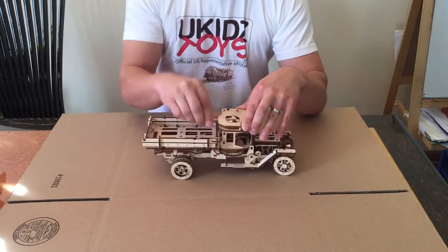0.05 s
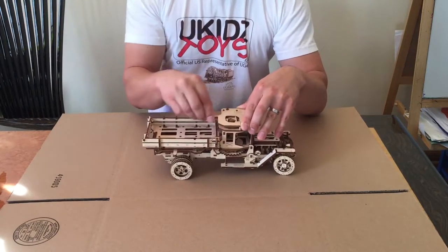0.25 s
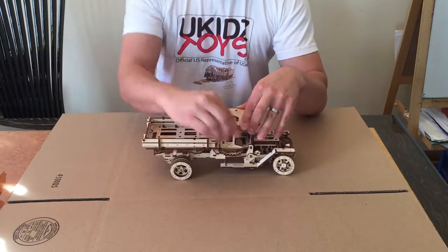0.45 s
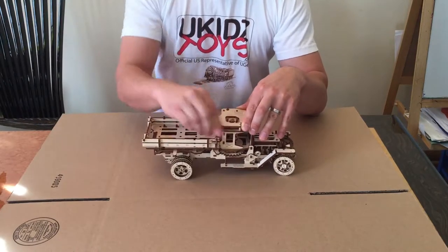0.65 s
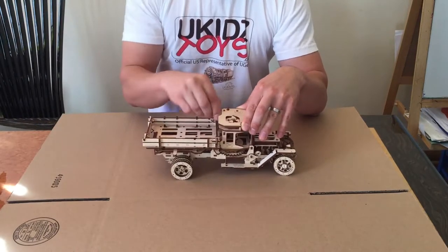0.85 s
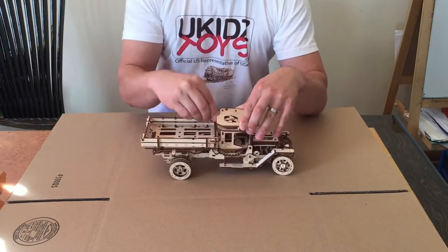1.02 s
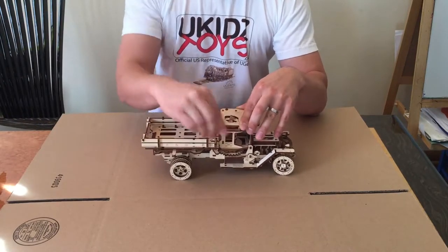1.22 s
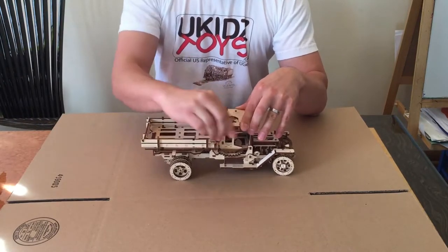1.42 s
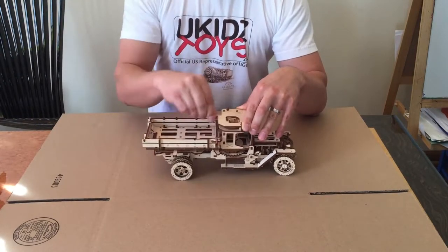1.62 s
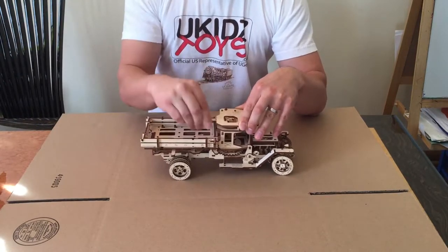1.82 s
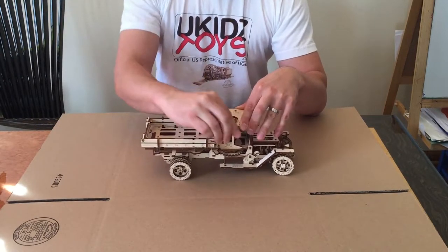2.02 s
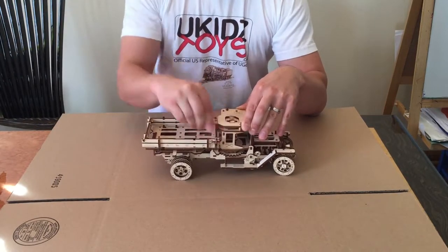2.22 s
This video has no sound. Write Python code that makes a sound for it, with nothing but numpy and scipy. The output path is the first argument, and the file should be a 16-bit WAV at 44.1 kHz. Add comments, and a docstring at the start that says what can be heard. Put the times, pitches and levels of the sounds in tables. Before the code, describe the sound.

Three short runs of crisp, bright ratchet clicks from a small wooden mechanism in a quiet room

```python
"""In a live room, one microphone hears a wooden toy truck whose ratchet is wound in three strokes of a lever.
On each stroke the springy pawl snaps over six or seven teeth: decaying sines, a noise crack, a low knock.
Near echoes, the ringing plywood frame and the room's tail of decaying noise follow every snap.
Around the strokes the lever gives faint noise ticks; fingers and lever slide and rub as shaped noise,
and hands nudge the truck on its cardboard mat in dull swells, over quiet room air and a faint hum."""
import sys
import numpy as np
from scipy import signal
from scipy.fft import rfft, irfft, next_fast_len
from scipy.io import wavfile
from scipy.ndimage import map_coordinates

SR = 44100
rng = np.random.default_rng(int(sys.argv[2]) if len(sys.argv) > 2 else 0)


def pcm_store(signal):
    """Save signal as 16-bit PCM."""
    levels = np.round(np.clip(np.atleast_2d(signal), -1, 1) * 32767)
    wavfile.write(sys.argv[1], SR, levels.astype(np.int16).T)


N = 101430
T = np.arange(N) / SR  # time in s


def amp(db):
    """Decibels to gain."""
    return 10 ** (np.asarray(db) / 20)


def decay(t, t60):
    """Exponential fade that has fallen by 60 dB at time t60."""
    return amp(-60 * t / t60)


def unit(x):
    """Scale to rms 1."""
    return x / np.sqrt(np.mean(x ** 2) + 1e-30)


def unit_energy(x):
    """Scale to energy 1."""
    return x / (np.linalg.norm(x) + 1e-20)


def along(points, hz):
    """Read (frequency, value) points on a log frequency axis."""
    point_hz, value = np.transpose(points)
    return np.interp(np.log(hz + 1), np.log(point_hz + 1), value)


def filtered(x, gain):
    """x times a gain that depends on frequency."""
    size = next_fast_len(len(x) + 4096)
    hz = np.fft.rfftfreq(size, 1 / SR)
    return irfft(rfft(x, size) * gain(hz), size)[:len(x)]


def noise(gain, size):
    """Coloured noise of rms 1."""
    return unit(filtered(rng.standard_normal(size), gain))


def hump(centre_hz, width_oct, skirt=0):
    """Gain of one broad resonance over a flat skirt."""
    return lambda hz: np.exp(-.5 * (np.log2((hz + 1) / centre_hz) / width_oct) ** 2) + skirt


def treble_limit(hz, top_hz):
    """Gain that falls steeply above top_hz."""
    return 1 / (1 + (hz / top_hz) ** 20)


def resonant(table, hz):
    """Gain of a set of resonances over a level of 1; a negative level makes a dip."""
    power = 1
    for centre_hz, width_hz, level_db in table:
        power = power + (amp(level_db) ** 2 - 1) / (1 + (2 * (hz - centre_hz) / width_hz) ** 2) ** 2
    return np.sqrt(np.abs(power))


def add(track, start_s, x):
    """Mix x into the track at start_s."""
    i = max(0, round(start_s * SR))
    track[i:i + len(x)] += x[:max(0, len(track) - i)]


def strength(db):
    """Size of a click of energy 1 that has this level over 3.6 ms."""
    return amp(db) * np.sqrt(.0036 * SR)


# colour of the indoor air: frequency [Hz], relative level [dB]
AIR_COLOUR = [(20, -11), (40, -10), (60, 1.5), (120, -4), (250, -4), (450, -13.5), (1000, -17),
              (3000, -20.5), (7000, -31.5), (13000, -33.5), (16000, -50)]
AIR_DB, HUM_HZ, HUM_DB = -67.5, 120.5, -73  # levels are rms


def room_tone():
    """Quiet indoor air as steady coloured noise, with a faint hum as one sine."""
    air = amp(AIR_DB) * noise(lambda hz: amp(along(AIR_COLOUR, hz)), N)
    hum = amp(HUM_DB) * np.sqrt(2) * np.sin(2 * np.pi * HUM_HZ * T)
    return air + hum


# how long each frequency lives in the room: frequency [Hz], t60 [s]
ROOM_DECAY = [(200, 0.28), (1200, 0.42), (3500, 0.38), (6000, 0.49), (9000, 0.38), (15000, 0.087)]


def room_tail(gain):
    """Reverberation of energy 1: noise in which each frequency dies at its own speed."""
    hz, t, spectrum = signal.stft(noise(gain, size=SR * 3 // 4), SR, nperseg=256)
    fade = decay(t, along(ROOM_DECAY, hz)[:, None])
    tail = signal.istft(spectrum * fade, SR, nperseg=256)[1]
    build_up = 1 - np.exp(-T[:len(tail)] / 0.0013)
    return unit_energy(tail * build_up)


HANDLING_TOP_HZ = 13600  # treble limit of the slide, the rubs and the bumps


def swells(rows, width_oct, skirt=0):
    """Friction and soft contact as short bell-shaped swells of noise, each round its own pitch."""
    out = np.zeros(N)
    for centre_s, length_s, level_db, pitch_hz in rows:
        shape = np.exp(-2 * ((T - centre_s) / length_s) ** 2)
        colour = hump(pitch_hz, width_oct, skirt)
        rustle = noise(lambda hz: colour(hz) * treble_limit(hz, HANDLING_TOP_HZ), N)
        out += amp(level_db) * np.linalg.norm(shape) * unit_energy(shape * rustle)
    return out


# hands nudge the truck on the mat: centre_s [s], length_s from centre to 13 % [s], level_db [dB], pitch_hz [Hz]
NUDGES = [(.22, 0.09, -64, 126), (.455, 0.024, -61, 178), (.62, 0.056, -71, 70), (.98, 0.11, -61, 110),
          (1.18, 0.042, -62.5, 205), (1.26, .06, -63.5, 74.4), (1.64, 0.025, -57, 68.7),
          (1.71, .05, -59, 117), (1.95, 0.096, -59.5, 57.5), (2.12, 0.067, -66, 70)]


def mat_bumps():
    """Dull low swells as the hands nudge the truck on its cardboard mat."""
    return swells(NUDGES, width_oct=0.51)


# fingers and lever sliding, before roughness: time_s [s], level_db [dB]
SLIDE_COURSE = [(0, -68), (.04, -62.5), (.07, -93), (.11, -77), (.17, -60), (.5, -70.5), (.62, -61),
                (.71, -67), (.755, -76.5), (.83, -62), (1.3, -65), (1.42, -64.5), (1.52, -67),
                (1.59, -82.5), (1.68, -63.5), (2.1, -67), (2.19, -65.5), (2.27, -82.5)]
# colour of the sliding: frequency [Hz], relative level [dB]
SLIDE_COLOUR = [(300, -24), (1000, 3), (2500, 2), (4500, 2), (6500, 3), (8500, -1.5), (13000, 2),
                (14500, -12.5)]


def sliding(rough_db=1.35, grain_rate_hz=200):
    """Fingers and lever slide: coloured noise whose level wavers in fine random grains."""
    grain = map_coordinates(rng.standard_normal(2048), [T * grain_rate_hz], mode="wrap")
    level_db = np.interp(T, *np.transpose(SLIDE_COURSE)) + rough_db * grain
    slide = amp(level_db) * noise(lambda hz: amp(along(SLIDE_COLOUR, hz)), N)
    return filtered(slide, lambda hz: treble_limit(hz, HANDLING_TOP_HZ))


# wood rubs on wood: centre_s [s], length_s from centre to 13 % [s], level_db [dB], pitch_hz [Hz]
WOOD_RUBS = [(.149, 0.025, -57, 4440), (.192, 0.019, -69, 5960), (.62, 0.027, -70, 2200),
             (.808, 0.022, -61, 3970), (.862, 0.022, -57.5, 5000), (1.172, 0.016, -48.5, 4700),
             (1.287, 0.028, -57, 1500), (1.375, 0.011, -69, 3030), (1.42, 0.029, -70.5, 1400),
             (1.703, 0.022, -62, 5950), (2.295, 0.025, -70, 1630)]


def rubs():
    """Short swells of brighter noise as wood rubs on wood."""
    return swells(WOOD_RUBS, width_oct=0.33, skirt=amp(-13))


# the lever takes up its slack: start_s [s], level_db of the tick itself [dB], pitch_hz [Hz]
LEVER_TICKS = [(.0322, -56, 6600), (0.033, -54, 2700), (.126, -44.5, 5780), (.718, -60.5, 6500),
               (0.791, -50, 4870), (0.834, -55, 3570), (1.1559, -42, 4900), (1.156, -59, 610),
               (1.251, -57, 2000), (1.42, -62, 1644), (1.519, -61.5, 5000), (1.629, -55, 4540),
               (1.645, -67, 4200), (1.667, -63, 3850)]
# resonances of the lever: centre_hz [Hz], width_hz [Hz], level_db [dB]
LEVER_MODES = [(3400, 380, 10), (4370, 220, 4), (5300, 400, -2), (6850, 540, 1.5), (9300, 630, 4)]
LEVER_TOP_HZ, TICK_WIDTH_OCT, TICK_SKIRT_DB = 13000, .4, -10.5
TICK_T60_S, RATTLE_T60_S = .016, 0.099
RATTLE_DB, TICK_ROOM_DB = -7, -10  # energy against the tick


def ticks():
    """Light contacts of the loose lever: a noise tick, sparse rattling grains and the room's tail."""
    out, t = np.zeros(N), T[:SR // 10]
    for start_s, level_db, pitch_hz in LEVER_TICKS:
        band = hump(pitch_hz, TICK_WIDTH_OCT, amp(TICK_SKIRT_DB))
        colour = lambda hz: band(hz) * resonant(LEVER_MODES, hz) * treble_limit(hz, LEVER_TOP_HZ)
        tick = unit_energy(noise(colour, len(t)) * decay(t, TICK_T60_S))
        # about one sample in fifty holds a grain
        grains = rng.standard_normal(len(t)) * (rng.random(len(t)) < .02)
        rattle = unit_energy(filtered(grains * decay(t, RATTLE_T60_S), colour))
        add(out, start_s, strength(level_db) * (tick + amp(RATTLE_DB) * rattle))
        add(out, start_s, strength(level_db + TICK_ROOM_DB) * room_tail(colour))
    return out


# resonances of the plywood frame: centre_hz [Hz], width_hz [Hz], level_db [dB]
FRAME_MODES = [(984, 150, 7), (1153, 160, 9), (1860, 110, 7.5), (2157, 230, 5.5), (2630, 170, 2),
               (2922, 24, 9), (4010, 150, -3), (4630, 110, 2.5), (5240, 400, 6.5), (5670, 400, 6),
               (6270, 270, 11.5), (6900, 57, 6.5), (7320, 52, 6.5), (8660, 630, 6.5)]
# broad slope under them: frequency [Hz], relative level [dB]
FRAME_SLOPE = [(100, -31), (400, -36), (750, -18), (1400, -8), (2000, -5.5), (4000, 2.5), (6000, 0.5),
               (9500, -0.5), (12000, -0.5), (15500, -12)]


def frame_gain(hz):
    """What the whole frame radiates: a broad slope with its resonances on top."""
    return amp(along(FRAME_SLOPE, hz)) * resonant(FRAME_MODES, hz)


SHIVER_HOLD = 2.7  # times longer than the width of a resonance implies


def shiver():
    """The frame's resonances ring on after a snap as decaying sines, the narrow ones longest."""
    t = T[:SR // 5]
    ring = np.zeros(len(t))
    for hz, width_hz, level_db in FRAME_MODES:
        mode_db = level_db + along(FRAME_SLOPE, hz) + 2 * rng.standard_normal()
        fade = np.exp(-np.pi * width_hz * t / SHIVER_HOLD)
        ring += amp(mode_db) * width_hz * fade * np.sin(2 * np.pi * (hz * t + rng.random()))
    return unit_energy(ring * (1 - np.exp(-t / 0.00099)))


# modes of the pawl at its reference pitch: frequency [Hz], relative level [dB], t60 [s]
PAWL_MODES = [(1005, -32.5, 0.011), (2687, -24.5, .014), (4250, -19, 0.012), (5460, -3.5, 0.0029),
              (6027, 2.5, 0.0038), (6616, -2, .0068), (7205, -8.5, .005), (8730, -6, 0.0035),
              (10500, -9, 0.0035), (10830, -10.5, 0.0032), (13300, -7, 0.0016), (15700, -13, 0.0019)]
# colour of the tooth's edge scraping past: frequency [Hz], relative level [dB]
CRACK_COLOUR = [(300, -36), (1500, -29), (3000, -10), (6000, -2.5), (9000, -1), (14000, 0), (16500, -14.5)]
PAWL_REFERENCE_HZ, ATTACK_S, MODE_SCATTER_DB = 6350, .00005, 0.2
CRACK_S, CRACK_DB = 0.0021, -11.0206  # energy against the pawl's ring
KNOCK_HZ, KNOCK_T60_S, KNOCK_BASE_DB = 560, 0.0013, -44.4748  # each click adds its own knock level


def snap(pitch_hz, knock_db):
    """One drop of the pawl: its modes as decaying sines, a noise crack and a low knock."""
    t = T[:1024]
    ring = np.zeros(len(t))
    for k, (mode_hz, mode_db, t60) in enumerate(PAWL_MODES):
        level = amp(mode_db + MODE_SCATTER_DB * rng.standard_normal())
        tone = np.sin(2 * np.pi * mode_hz * pitch_hz / PAWL_REFERENCE_HZ * t)
        ring += (-1) ** k * level * decay(t, t60) * tone  # neighbours start in opposite directions
    ring *= 1 - np.exp(-t / ATTACK_S)
    crack = noise(lambda hz: amp(along(CRACK_COLOUR, hz)), len(t)) * np.exp(-(t / CRACK_S) ** 2)
    knock = amp(KNOCK_BASE_DB + knock_db) * np.sin(2 * np.pi * KNOCK_HZ * t) * decay(t, KNOCK_T60_S)
    return unit_energy(unit_energy(ring) + amp(CRACK_DB) * unit_energy(crack) + knock)


# the pawl drops off a tooth: start_s [s], level_db [dB], pitch_hz [Hz], knock_db above its base [dB]
TOOTH_DROPS = [(0.2055, -15.5, 6430, 14), (0.2346, -16, 6310, -11), (0.2612, -16.5, 6200, -8),
               (0.2841, -16, 6320, -1), (0.3082, -16.5, 6380, -15), (0.3343, -18, 6020, -13.5),
               (.38, -16.5, 6340, -14), (0.8778, -15, 6290, 12.5), (.906, -14.5, 6240, 8),
               (0.9292, -16.5, 6100, -0.5), (0.9529, -16, 6280, 10.5), (0.9779, -18, 6520, -0.5),
               (1.0019, -16.5, 6050, -1.5), (1.0288, -17.5, 6140, -11.5), (1.7204, -15.9, 6120, 10.5),
               (1.7488, -15.5, 6210, 3.5), (1.7744, -15.5, 6140, -10), (1.7976, -16.5, 6070, -12),
               (1.8225, -16.5, 6230, 2.5), (1.8503, -18.1, 6160, 1)]
# reflections from table top, chest and wall: delay_s [s], level_db [dB]
NEAR_ECHOES = [(.0018, -10.5), (.0054, -16.5), (.0119, -26), (.0138, -26.5), (.019, -30)]
SHIVER_DB, ROOM_DB = -14, -10  # energy against the snap
ROOM_ALIKE = .68  # share of the tail that is common to all snaps


def ratchet():
    """Every snap comes with near echoes, a shiver of the frame and the room's tail."""
    out, common = np.zeros(N), room_tail(frame_gain)
    for start_s, level_db, pitch_hz, knock_db in TOOTH_DROPS:
        click = strength(level_db) * snap(pitch_hz, knock_db)
        add(out, start_s, click)
        for delay_s, echo_db in NEAR_ECHOES:
            add(out, start_s + delay_s, amp(echo_db) * click)
        add(out, start_s, strength(level_db + SHIVER_DB) * shiver())
        tail = ROOM_ALIKE * common + np.sqrt(1 - ROOM_ALIKE ** 2) * room_tail(frame_gain)
        add(out, start_s, strength(level_db + ROOM_DB) * tail)
    return out


def scene():
    """All sources at one microphone."""
    handling = mat_bumps() + sliding() + rubs()
    return (room_tone() + handling + ticks() + ratchet())[None]


def record(dry):
    """The recorder cuts very steeply above its band limit of 16450 Hz."""
    return filtered(dry[0], lambda hz: 1 / np.sqrt(1 + (hz / 16450) ** 120))[None]


dry = scene()
out = record(dry)
pcm_store(out)
```